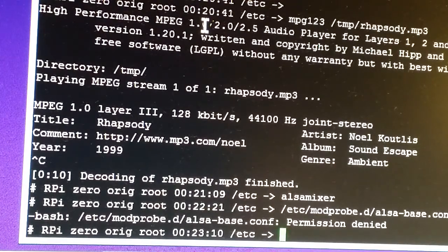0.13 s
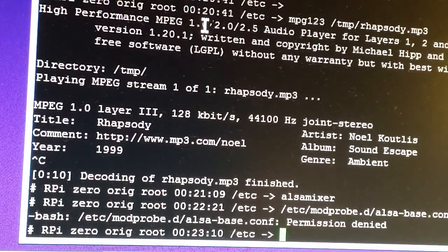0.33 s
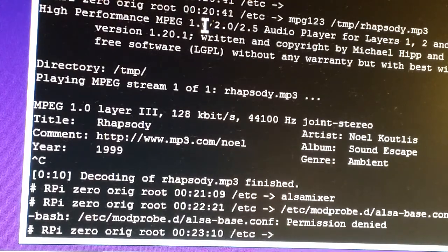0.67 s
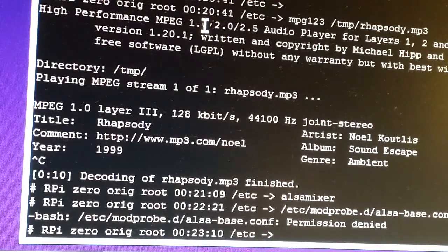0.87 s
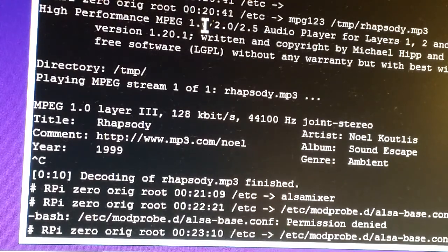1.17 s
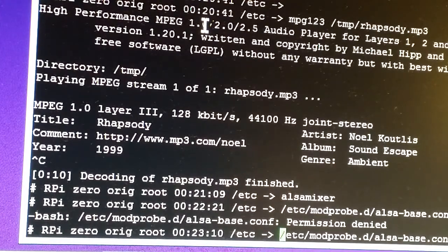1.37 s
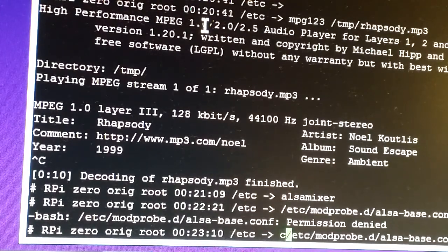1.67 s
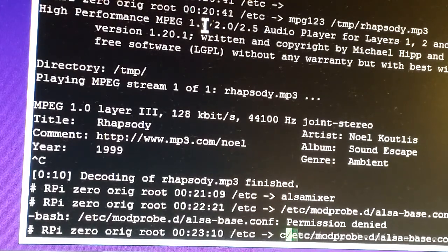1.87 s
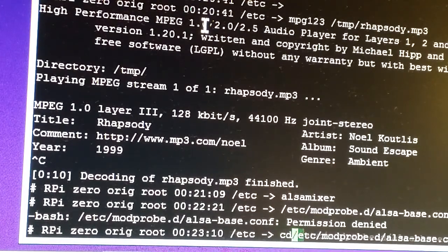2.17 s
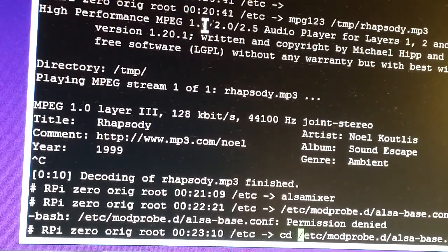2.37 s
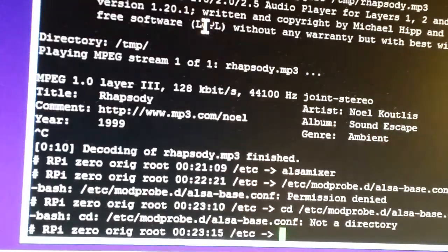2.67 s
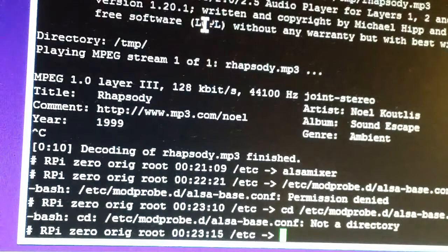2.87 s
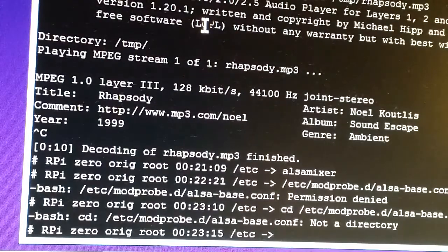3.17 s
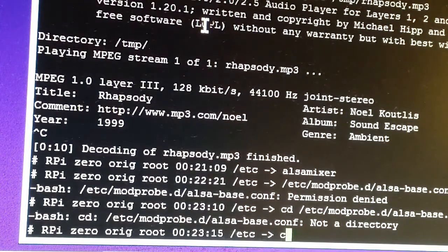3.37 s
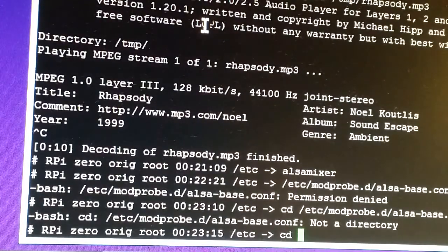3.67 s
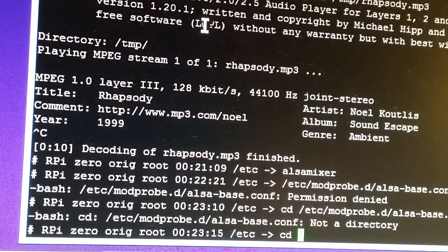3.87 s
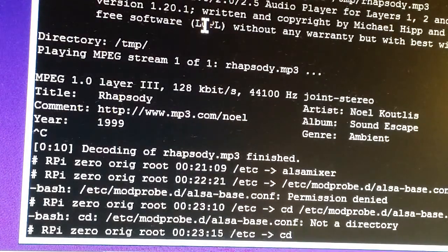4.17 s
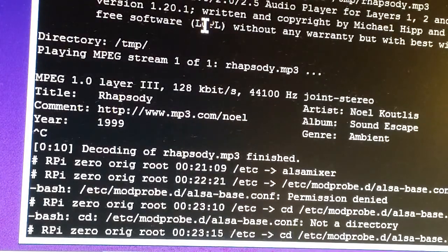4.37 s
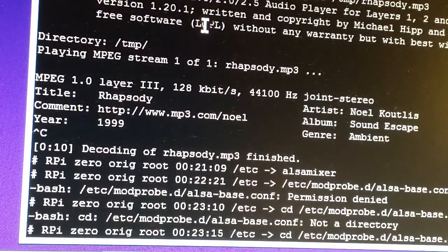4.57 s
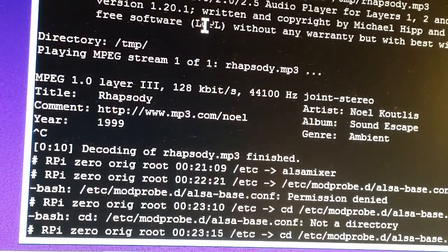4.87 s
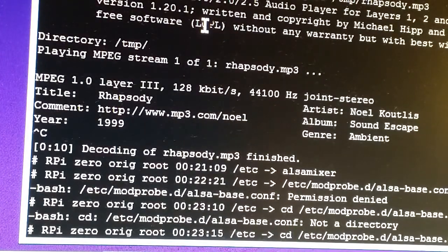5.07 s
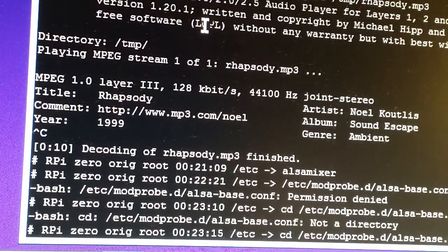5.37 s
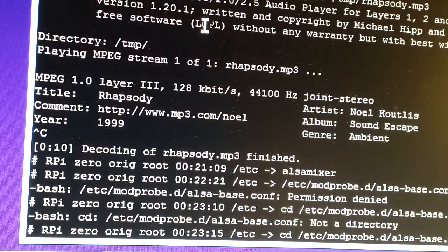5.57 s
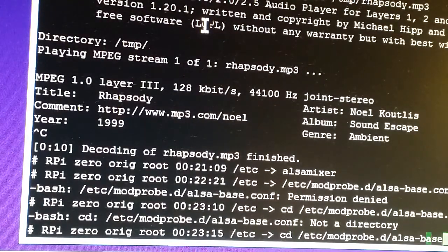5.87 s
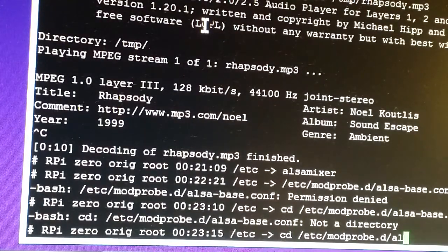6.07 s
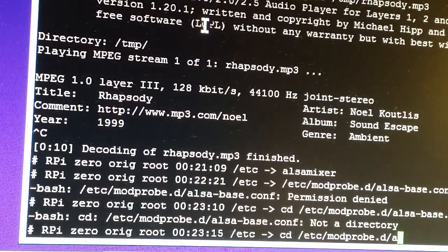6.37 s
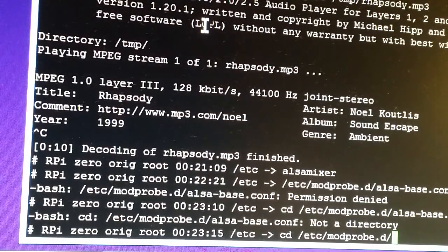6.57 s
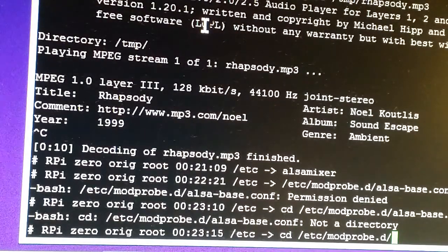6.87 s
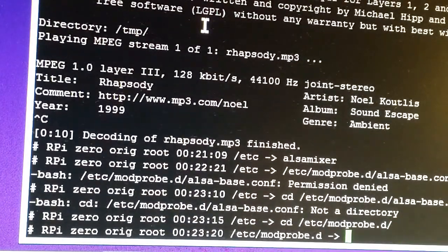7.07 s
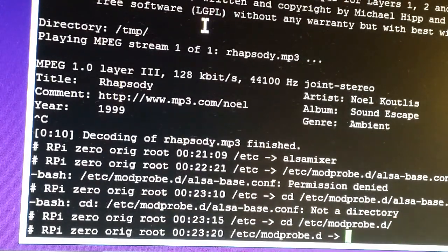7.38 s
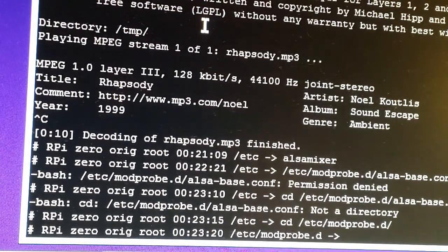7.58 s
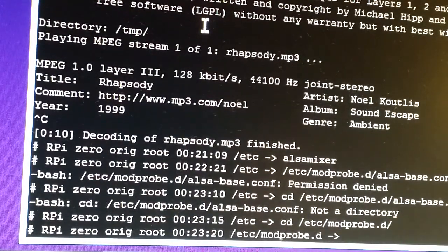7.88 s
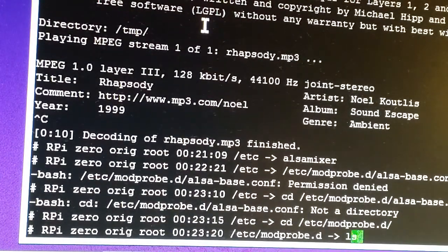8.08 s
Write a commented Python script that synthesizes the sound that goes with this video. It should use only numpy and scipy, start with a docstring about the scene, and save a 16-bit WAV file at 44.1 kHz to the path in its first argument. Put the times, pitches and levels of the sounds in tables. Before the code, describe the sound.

Short uneven bursts of light plastic computer-keyboard typing, crisp clicks and soft taps, over a steady low fan hum in a quiet room.

```python
"""Short commands on a plastic keyboard

Someone types in bursts in a quiet room: rough, stereo strikes ring the keys' edges, stems and caps,
the case and the base. Light taps, loose rattles and grainy rubbing fill in around the firm contacts,
and a short room tail follows. A fan adds shaped air noise and wavering tones; a low swell near 165 Hz
rises and fades. Both microphones hiss, and the right one's port rings near 9 kHz."""
import sys
import numpy as np
from scipy import signal
from scipy.fft import rfft, irfft, next_fast_len
from scipy.io import wavfile
from scipy.ndimage import uniform_filter1d, map_coordinates

SR = 44100
rng = np.random.default_rng(int(sys.argv[2]) if len(sys.argv) > 2 else 0)


def digitize_waveform(pressure):
    """Quantize a signal to 16-bit integers and store it at the path in sys.argv[1].

    Rows of a 2-D input are taken as channels; values are limited to [-1, 1].
    """
    field = np.atleast_2d(pressure).T
    bounded = np.clip(field, -1, 1)
    quanta = np.round(bounded * 32767).astype(np.int16)
    wavfile.write(sys.argv[1], SR, quanta)


N = 363031  # length [samples]

# Resonances of the keycaps, the stems and the keys' hard edges:
# (frequency [Hz], width [Hz], relative level [dB])
KEYCAP_MODES = [(3230, 1050, -7.5), (4750, 1770, -7), (6820, 1070, -2.5)]
STEM_MODES = [(7580, 2560, 0.5), (8530, 2340, 0), (10600, 870, -13)]
EDGE_MODES = [(11340, 2800, -6.5), (12340, 2840, -1.5), (15000, 2700, -8)]
# Fingers brushing over the keycaps, which rattle in their guides:
# (middle [s], length [s], level [dB])
BRUSHES = [(0.159, 0.019, -70), (0.199, 0.023, -67), (1.162, .016, -72), (1.198, .016, -70),
           (1.46, 0.066, -64), (1.67, 0.011, -63), (1.698, 0.032, -64), (1.819, 0.023, -65),
           (1.933, 0.02, -67), (2.029, 0.015, -66), (2.324, 0.026, -55), (2.464, 0.025, -63),
           (3.03, 0.063, -64.5), (3.349, 0.0096, -63), (3.37, .016, -63), (3.426, 0.028, -68),
           (3.529, 0.017, -58), (3.635, .016, -62), (3.711, 0.049, -55), (4.494, 0.02, -70),
           (5.2, 0.0069, -65), (6.052, 0.035, -67), (6.288, 0.022, -65), (6.507, 0.025, -61.5),
           (7.006, 0.015, -57), (7.296, 0.089, -63.5), (7.395, 0.025, -66), (7.93, 0.03, -70),
           (8.09, 0.02, -68)]


def amp(db):
    """Decibels to gain."""
    return 10 ** (np.asarray(db) / 20)


def unit(x):
    """Scale to rms 1."""
    return x / np.sqrt(np.mean(x ** 2) + 1e-20)


def along(points, hz):
    """Read (frequency [Hz], value) points on a log frequency axis."""
    f, value = np.transpose(points)
    return np.interp(np.log(hz + 1), np.log(f + 1), value)


def wobble(rate):
    """A smooth random curve through rate knots a second."""
    knots = rng.standard_normal(2048)
    return map_coordinates(knots, [np.arange(N) * rate / SR], mode="wrap")


def filtered(x, response):
    """Filter x by a complex response of frequency, with padding for the ring."""
    n = x.shape[-1]
    padded = next_fast_len(n + 2048)
    spectrum = rfft(x, padded) * response(np.fft.rfftfreq(padded, 1 / SR))
    return irfft(spectrum, padded)[..., :n]


def resonance(f, hz, width):
    """Response of one damped mode, with gain 1 at its centre."""
    return 1j * f * width / (hz * hz - f * f + 1j * f * width)


def narrow(hz, width, steady=0):
    """A tone of rms 1: a steady part and a part that wanders in strength and phase."""
    phase = 2 * np.pi * (hz * np.arange(N) / SR + rng.random())
    in_phase = (steady + wobble(width)) * np.cos(phase)
    return unit(in_phase + wobble(width) * np.sin(phase))


def fan(air_db=-53.0, sway=0.27):
    """Turbulent air as shaped stereo noise, with wavering tones."""
    # Air noise spectrum: (frequency [Hz], relative density [dB])
    air_colour = [(25, -48), (36, -29), (47, -8.5), (65, -1), (95, 2.5), (190, 0), (225, -3.5), (280, -5.5),
                  (350, -6), (460, -12), (750, -12), (1100, -15.5), (1700, -23.5), (8000, -29.5)]
    # Likeness of left and right air noise: (frequency [Hz], correlation [-1 to 1])
    air_likeness = [(60, 0.93), (150, 0.98), (300, 0.83), (500, 0.6), (1000, -0.11), (2000, -0.16),
                    (6000, 0.069)]
    # Contour of the air rush, centred and then scaled by sway: (time [s], level [dB])
    air_contour = [(0.0, -49), (0.78, -54.5), (1.99, -43), (2.86, -55.5), (5.32, -55.5), (5.43, -61),
                   (6.83, -52), (7.84, -59), (8.23, -53)]
    # Fan tones: (frequency [Hz], level [dB], wander rate [Hz], left minus right [dB])
    fan_tones = [(159.9, -66.5, 7.2, -5), (193.8, -65, 20, -1.5), (241.2, -69, 6, -1),
                 (311.4, -64.5, 11, -0.5), (320.8, -72, 12, 9), (771, -74, 21, -8.5), (950, -81.5, 25, -14),
                 (1054, -82, 14, 17), (1243, -83.5, 16, 13.5)]
    t = np.arange(N) / SR

    def mid_side(f):
        turn = np.arccos(np.clip(along(air_likeness, f), -1, 1)) / 2
        return amp(along(air_colour, f)) * [np.cos(turn), np.sin(turn)]

    mid, side = filtered(rng.standard_normal((2, N)), mid_side)
    flow_db = np.interp(t, *np.transpose(air_contour))
    air_gain = amp(air_db + sway * (flow_db - flow_db.mean()))
    air = air_gain * unit(np.array([mid + side, mid - side]))

    tones = np.zeros((2, N))
    for hz, db, width, pan in fan_tones:
        sides = amp([[pan / 2], [-pan / 2]])
        tones += amp(db) * sides * narrow(hz, width, steady=2.95)
    return air * amp([[-.5], [.5]]) + tones


def low_swell(peak_s=1.99, peak_db=-51, slope_db_per_s=7.5):
    """A wandering low tone rises once and fades at the same slope, slightly to the right."""
    t = np.arange(N) / SR
    level_db = peak_db - slope_db_per_s * np.abs(t - peak_s)
    return amp(level_db) * narrow(165, width=55) * amp([[-.5], [.5]])


def contacts(count=2):
    """Firm key contacts, light fingertip taps, and a few loose keycap rattles in each brush."""
    # Keys hitting their stops, bouncing or springing back; levels are before each part's trim:
    # (time [s], base thump [dB], case knock [dB], cap clack [dB], stem snap [dB], edge tick [dB],
    # left minus right [dB], case ring [Hz], cap ring [Hz], stem ring [Hz],
    # softness [contact time, 1 = usual, before limiting])
    firm = [(0.1893, -67, -72, -59, -48, -57, -10, 1310, 6400, 8640, 0.47),
            (0.2056, -60, -64, -61, -63, -62, -3, 1310, 3060, 8830, 1.15),
            (1.1956, -68, -64, -59, -59, -62, -9, 1430, 5800, 7970, 1.2),
            (1.2032, -72, -71, -61, -56, -61, -4, 1380, 3000, 8440, 0.7),
            (1.2874, -61, -69, -57, -53.5, -55, -1, 2230, 6600, 7960, 0.8),
            (1.509, -65, -62, -57, -55, -53, -5, 1970, 4200, 7750, 1.2),
            (1.588, -57, -58, -40, -39, -42, -3, 2300, 3630, 7840, 0.49),
            (1.6665, -64, -66, -53, -54, -62, -11, 2340, 5270, 8270, 1.17),
            (1.7182, -66, -55, -49, -64, -57, -1, 1630, 4420, 7450, 0.53),
            (1.809, -59, -54, -54, -49, -55, -7, 2200, 6000, 8440, 0.6),
            (1.8283, -62, -57, -51, -46, -51, -13, 2450, 3200, 7320, 0.76),
            (2.0286, -53, -51, -51, -52, -57, -7, 1310, 3360, 8350, 0.7),
            (2.1312, -61, -62, -43, -46, -45.5, -4, 1760, 5400, 7360, 0.88),
            (2.1765, -45, -41, -45.5, -78, -64, -8, 1250, 3830, 7360, 0.85),
            (2.3119, -71, -67, -48, -49, -57, -14, 2450, 5530, 7490, 1.8),
            (2.3149, -68, -56, -41, -40.5, -48, -8, 2260, 5470, 7580, 0.57),
            (2.318, -64, -57, -45, -48, -47, -12, 1330, 5240, 8010, 0.88),
            (2.3257, -69, -61, -42.5, -45.5, -52, -10, 2120, 5930, 9400, 0.9),
            (2.3342, -66, -68, -48, -58, -57, 0, 1310, 3160, 9860, 0.95),
            (2.3456, -66, -66, -48, -61, -53, -6, 1880, 5900, 7150, 1.2),
            (2.4537, -65, -52, -46.5, -43.5, -53, -10, 1690, 6500, 8660, 0.46),
            (2.4571, -71, -53, -44, -51, -55, -7, 2400, 6500, 6980, 0.92),
            (2.4659, -69, -52, -45.5, -49, -46, -3, 1600, 6100, 6940, 0.85),
            (2.5779, -51, -56, -51, -50.5, -52, -10, 1440, 6500, 9100, 0.55),
            (3.0084, -58, -68, -66, -52, -57, -12, 1310, 5900, 7740, 1.05),
            (3.309, -57, -48.5, -40.5, -53, -45, -5, 1610, 6300, 7410, 0.73),
            (3.315, -68, -54, -51, -52, -51, 1, 1680, 3820, 8660, 1.8),
            (3.3507, -63, -66, -52, -53, -56, -10, 1310, 5700, 7020, 1.8),
            (3.4253, -68, -54, -50.5, -73, -60, -4, 1930, 3570, 9860, 0.77),
            (3.5252, -64, -56, -46.5, -45, -51, -11, 2280, 5440, 7580, 0.89),
            (3.5585, -45, -42, -47, -75, -70, -6, 1520, 3300, 7240, 1.1),
            (3.6376, -56, -55, -51, -51, -49, -6, 1560, 5330, 7060, 0.81),
            (3.688, -70, -62, -49, -56, -55, -3, 2420, 5000, 7840, 1.4),
            (3.6924, -59, -62, -45, -40.5, -49, -11, 2400, 5000, 7840, 1),
            (3.696, -70, -68, -51, -50, -49, -3, 2000, 5100, 8480, 1.4),
            (3.7001, -55, -68, -54, -49, -49, 0, 1970, 4860, 6930, 0.84),
            (3.7047, -65, -65, -48, -44, -47, -12, 2330, 4830, 7620, 0.6),
            (3.7125, -60, -72, -50, -55, -54, -14, 1400, 4750, 7240, 1.3),
            (3.7232, -71, -66, -46, -46, -56, -16, 1500, 4700, 8570, 1.08),
            (3.726, -60, -71, -53, -49, -57, -3, 1460, 4860, 8570, 1.2),
            (3.8081, -61, -68, -57, -47, -60, -2, 1310, 5200, 8500, 0.6),
            (3.824, -63, -70, -62, -51.5, -55, 0, 1720, 6400, 8230, 0.74),
            (3.98, -66, -55.5, -54, -53, -58, -8, 1480, 4340, 8750, 0.74),
            (4.323, -67, -68, -44, -47.5, -45, -3, 1920, 3500, 7800, 0.8),
            (4.9547, -44.5, -43.5, -38.5, -40, -39, -7, 1950, 5750, 9300, 0.88),
            (4.9615, -52, -49, -44, -50, -33, -6, 1930, 5870, 7400, 0.6),
            (5.0365, -50, -52, -54, -65, -58, -8, 2280, 3250, 9600, 0.79),
            (5.042, -61, -51, -47, -44.5, -52, -7, 1610, 6300, 8480, 0.94),
            (5.107, -56, -48, -43, -41.5, -48, -9, 1690, 5500, 8200, 0.58),
            (5.1138, -67, -46, -42, -46.5, -45, -8, 2040, 4800, 9220, 0.8),
            (5.118, -50, -55, -57, -63, -56, -8, 1920, 5460, 7540, 1),
            (5.214, -68, -55, -50, -56, -60, -8, 1600, 3360, 8140, 0.92),
            (5.2456, -52, -47.5, -46, -39.5, -51, -9, 1600, 5400, 9300, 0.5),
            (5.2654, -58, -53, -46, -52, -45, -8, 1640, 3120, 8180, 0.9),
            (6.0684, -59, -56, -54, -49.5, -53, -12, 1910, 4650, 8800, 0.95),
            (6.1905, -58, -53, -52.5, -48, -55, -9, 1970, 4850, 8400, 0.7),
            (6.294, -53, -61, -51, -52, -53, -7, 1920, 5800, 8530, 0.72),
            (6.4069, -54, -47.5, -41, -41.5, -42, -3.5, 2470, 7000, 8400, 0.81),
            (6.4207, -52, -57, -51, -68, -60, -10, 1890, 5400, 8530, 0.84),
            (6.5022, -56, -50, -57, -63, -56, -13, 1610, 5100, 7280, 1.1),
            (6.5065, -53, -61, -58, -58, -54, -8, 1920, 3200, 8480, 0.9),
            (6.5135, -62, -61, -56, -59, -53, -10, 1890, 3220, 8600, 1),
            (6.8922, -48, -49, -40, -46, -38.5, -8, 2320, 6600, 8740, 0.5),
            (6.8988, -42, -42, -35, -44, -45, -9, 2470, 4760, 7450, 0.72),
            (7.0058, -68, -56, -56, -49, -52, -9, 2300, 6000, 9200, 0.66),
            (7.0098, -70, -61, -54, -47, -43.5, -10, 1550, 5900, 7360, 0.56),
            (7.243, -70, -54, -52.5, -51, -49, -13, 1730, 2980, 6930, 0.5),
            (7.2474, -70, -69, -49, -54, -57, -15, 1980, 6100, 8610, 0.6),
            (8.1852, -65, -62.5, -56, -53, -52, -4.5, 1720, 6100, 7700, 1.1)]
    # Fingertips tapping keycaps without pressing them, before each part's trim:
    # (time [s], cap clack [dB], stem snap [dB], edge tick [dB])
    fingertip_taps = [(0.1502, -57.5, -59, -60), (0.1618, -63, -60, -58), (0.4652, -58, -62, -61),
                      (1.1527, -57, -62, -57), (1.7124, -55, -65, -56), (1.7272, -58, -62, -55),
                      (2.033, -56, -57, -54), (2.4857, -55, -57, -62), (2.591, -56, -60, -61),
                      (3.0159, -58, -49.5, -59), (3.029, -59, -55, -61), (3.0481, -57, -58, -58),
                      (3.3661, -56, -63, -59), (3.4178, -60, -64, -58), (3.4355, -57, -66, -61),
                      (3.4865, -59, -59, -57), (4.3301, -55, -61, -58), (4.4914, -59, -55, -62),
                      (6.0565, -57, -62, -57), (6.2242, -58, -61, -63), (6.3039, -55, -55, -57),
                      (6.4851, -54, -61, -62), (7.1317, -61, -68, -63), (7.2594, -60, -65, -62),
                      (7.2802, -59, -70, -64), (7.3008, -58, -66, -64), (7.3961, -56, -63, -65),
                      (7.9269, -60, -51, -65), (7.9618, -63, -62, -59), (8.1055, -58, -62, -61),
                      (8.1239, -63, -56, -57)]
    rattle_db, rattle_scatter_db, rattle_edge_db = 5.5, 1.5, -6  # over brush, spread, edge over cap
    light_knock_db, light_pan_db, light_softness = -12, -8, 0.7  # knock over cap, left minus right

    touches = list(fingertip_taps)
    for middle, length, brush_db in BRUSHES:
        place = (np.arange(count) + rng.random(count)) / count - .5
        strength = brush_db + rattle_db + rattle_scatter_db * rng.standard_normal(count)
        for p, clack in zip(place, strength):
            edge = clack + rattle_edge_db
            touches.append((middle + length * p, clack, edge, edge))

    rings = rng.choice(np.array(firm)[:, 7:10], len(touches))  # any of the keys may sound
    light = []
    for (s, clack, snap, tick), ring in zip(touches, rings):
        knock = clack + light_knock_db
        light.append((s, knock, knock, clack, snap, tick, light_pan_db, *ring, light_softness))
    return np.array(list(firm) + light)


def strike(modes, softness, rise, t60, chatter_db, chatter_t60, spread, scatter_db, crack,
           clump_db=3.5, detune=0.015):
    """A rough impact, a sharp crack at its peak and fading chatter ring a part; soft ones last longer."""
    muffle_ratio = 1.83  # a part cannot follow shakes this many times faster than its highest ring
    count, t = len(softness), np.arange(SR // 20) / SR
    impact = amp(-60 * t / (t60 * softness)) * (1 - np.exp(-(t / (rise * softness)) ** 2))
    impact = impact / impact.max(axis=-1, keepdims=True)

    slow_noise = uniform_filter1d(rng.standard_normal((count, 1, len(t))), size=40)
    clumps = unit(amp(clump_db * unit(slow_noise)))
    chatter = clumps * amp(chatter_db - 60 * t / chatter_t60) * (1 - np.exp(-t / rise))

    grain = rng.standard_normal((count, 3, len(t)))
    stereo_grain = grain[:, :1] + spread * grain[:, 1:]  # partly shared by the two microphones
    force = (impact + chatter) * stereo_grain
    force = force + crack * (impact == 1)  # one broadband click at the impact's peak

    chance = rng.standard_normal((count, len(modes), 2, 1, 1))  # every contact rings differently
    top_hz = muffle_ratio * max(np.max(hz) for hz, _, _ in modes)

    def body(f):
        total = 0
        for k, (hz, width, db) in enumerate(modes):
            gain = (-1) ** k * amp(db + scatter_db * chance[:, k, 0])
            total = total + gain * resonance(f, hz * np.exp(detune * chance[:, k, 1]), width)
        return total / (1 + 1j * np.sqrt(2) * f / top_hz - (f / top_hz) ** 2)

    ring = filtered(force, body)
    attack = ring[..., :SR // 220]
    return ring / np.sqrt(np.mean(attack ** 2, axis=-1, keepdims=True))


def keyboard(touches, lead=.0006):
    """Contacts tick edges, snap stems, clack caps, knock the case, thump the base; highs die sooner."""
    # Resonances of the base and the case: (frequency [Hz], width [Hz], relative level [dB])
    base_modes = [(308, 54, 3), (440, 100, -2), (624, 106, -2.5), (782, 116, 3.5), (1040, 430, 0)]
    case_modes = [(1550, 570, -6.5), (2550, 1900, -12.5)]
    case_width_hz, cap_width_hz, stem_width_hz = 370, 440, 620  # rings that depend on the key
    stem_ring_db = 6.5  # the stem's ring against its broad snap
    thump_trim, knock_trim, clack_trim, snap_trim, tick_trim = -2.0, -1.2, 0.0, -3.0, 0.0  # dB

    columns = np.transpose(touches)[..., None, None]
    s, thump, knock, clack, snap, tick, pan, case_hz, cap_hz, stem_hz, softness = columns
    softness = np.clip(softness, .3, 2.5)
    case = [(case_hz, case_width_hz, 0)] + case_modes
    cap = [(cap_hz, cap_width_hz, 0)] + KEYCAP_MODES
    stem = STEM_MODES + [(stem_hz, stem_width_hz, stem_ring_db)]

    # rise, t60 and chatter_t60 are in seconds
    hits = amp(thump + thump_trim) * strike(
        base_modes, softness, rise=.0012, t60=.014, chatter_db=-13, chatter_t60=.06,
        spread=.7, scatter_db=1, crack=7)
    hits += amp(knock + knock_trim) * strike(
        case, softness, rise=.0009, t60=.011, chatter_db=-12, chatter_t60=.055,
        spread=.8, scatter_db=1, crack=5)
    hits += amp(clack + clack_trim) * strike(
        cap, softness, rise=.0009, t60=.006, chatter_db=-10, chatter_t60=.032,
        spread=.9, scatter_db=1, crack=4)
    hits += amp(snap + snap_trim) * strike(
        stem, softness, rise=.001, t60=.005, chatter_db=-11, chatter_t60=.028,
        spread=.9, scatter_db=1, crack=3)
    hits += amp(tick + tick_trim) * strike(
        EDGE_MODES, softness, rise=.0009, t60=.004, chatter_db=-11, chatter_t60=.03,
        spread=.9, scatter_db=1.5, crack=2.2)

    keys = np.zeros((2, N + SR))
    starts = (s - lead * softness).ravel()  # the impact starts to build before its listed time
    for start, side, hit in zip(starts, pan.ravel(), hits):
        sides = unit(amp([[side / 2], [-side / 2]]))
        keys[:, round(start * SR):][:, :hit.shape[1]] += hit * sides
    return keys[:, :N]


def rubbing(touches, slide_db=-6):
    """Grainy friction: fingers brush the caps, and each contact is led in by a short slide."""
    t = np.arange(N) / SR
    pressure = np.zeros(N)
    for middle, length, db in BRUSHES:
        pressure += amp(db) * np.exp(-(2 * (t - middle) / length) ** 2)
    approach = np.exp(-np.arange(SR // 80)[::-1] / (SR * .0022))
    for s, _, _, clack, *_ in touches:
        end = round(s * SR)
        pressure[end - len(approach):end] += amp(clack + slide_db) * approach

    grains = rng.standard_normal((2, N)) * amp(7 * wobble(600))

    def caps(f):
        total = 0
        for k, (hz, width, db) in enumerate(KEYCAP_MODES + STEM_MODES + EDGE_MODES):
            total = total + (-1) ** k * amp(db) * resonance(f, hz, width)
        return total / (1 + 1j * f / 3500)  # softens the treble

    return pressure * amp([[-1.5], [1.5]]) * unit(filtered(grains, caps))


def room(x, count=16):
    """A small room's noise tail, new for each equal stretch; the midrange lasts longest."""
    # Decay by 60 dB: (frequency [Hz], time [s])
    decay = [(200, 0.13), (1500, 0.19), (5000, 0.19), (9000, 0.16), (14000, 0.12)]
    hz, t, z = signal.stft(rng.standard_normal((count, 2, SR // 3)), SR, nperseg=256)
    fading = z * amp(-60 * t / along(decay, hz)[:, None])
    tails = signal.istft(fading, SR, nperseg=256)[1]
    wet = np.zeros((2, N + SR))
    for span, tail in zip(np.array_split(np.arange(N), count), tails):
        echo = signal.fftconvolve(x[:, span], tail / np.linalg.norm(tail[0]), axes=1)
        wet[:, span[0]:][:, :echo.shape[1]] += echo
    return wet[:, :N]


def scene(left_lag=0.0003497, room_db=-12):
    """The keys lie to the right: they reach the left microphone later and with another colour."""
    # The left microphone faces away from the keys: (frequency [Hz], gain [dB])
    left_colour = [(2000, 4), (3200, 1.5), (5600, 7), (7500, 8), (9800, 0), (11300, -5), (15000, -2)]
    touches = contacts()
    left, right = keyboard(touches) + rubbing(touches)

    def path(f):
        delay = np.exp(-2j * np.pi * f * left_lag)  # left_lag in seconds
        return amp(along(left_colour, f)) * delay

    keys = np.array([filtered(left, path), right])
    return keys + amp(room_db) * room(keys) + fan() + low_swell()


def causal(points, f):
    """Minimum-phase response with the gain of (Hz, dB) points: it rings only after a click."""
    cepstrum = irfft(np.log(amp(along(points, f))))
    folded = rfft(2 * cepstrum[:len(f) - 1], len(cepstrum))
    return np.exp(folded - cepstrum[0])


def record(dry, hiss_db=-65.5):
    """Microphones add shaped hiss, the right port's resonances ring, and the top is cut steeply."""
    # Microphone self-noise spectrum: (frequency [Hz], relative density [dB])
    hiss_colour = [(100, -8), (2000, 1.5), (3400, -2.5), (4500, -6.5), (6000, 6.5), (9700, 5), (11000, -3),
                   (15500, -1.5)]
    # Response of the right microphone's port: (frequency [Hz], gain [dB])
    port_response = [(5500, 0), (7300, 0.5), (7650, 7), (8100, 10), (8450, 10.5), (8880, 17.5), (9250, 11),
                     (9450, 18), (9750, 12.5), (9970, 15.5), (10330, 9.5), (10600, 8.5), (10950, 7.5),
                     (11900, 1.5), (15000, -1)]
    top_hz = 15550
    noise = rng.standard_normal((2, N))
    hiss = unit(filtered(noise, lambda f: amp(along(hiss_colour, f))))
    left, right = dry + amp(hiss_db) * hiss  # level ahead of the port
    right = filtered(right, lambda f: causal(port_response, f))
    return filtered(np.array([left, right]), lambda f: 1 / np.sqrt(1 + (f / top_hz) ** 160))


dry = scene()
out = record(dry)
digitize_waveform(out)
```